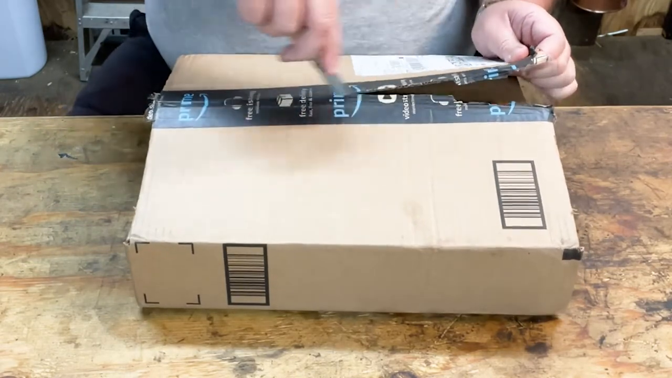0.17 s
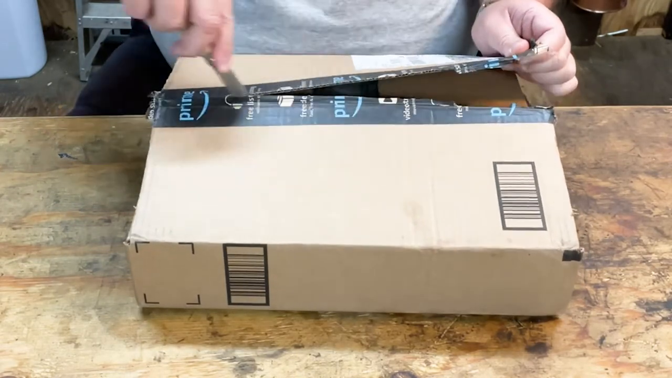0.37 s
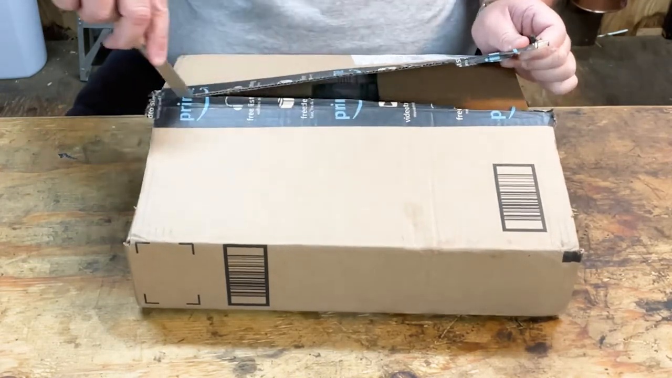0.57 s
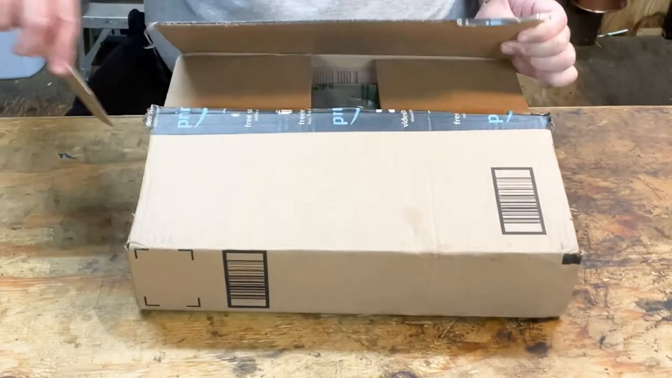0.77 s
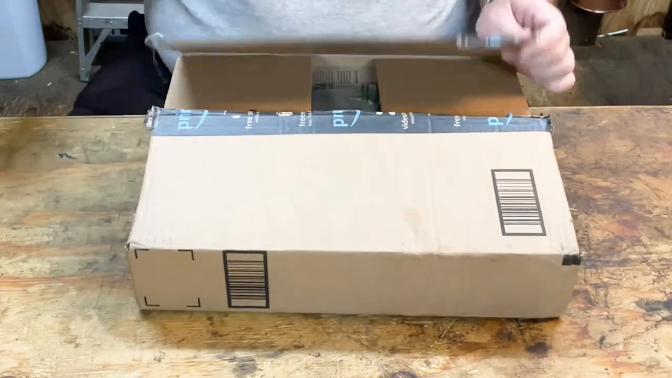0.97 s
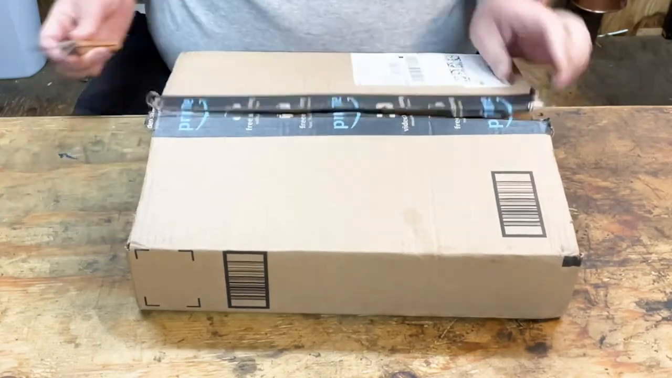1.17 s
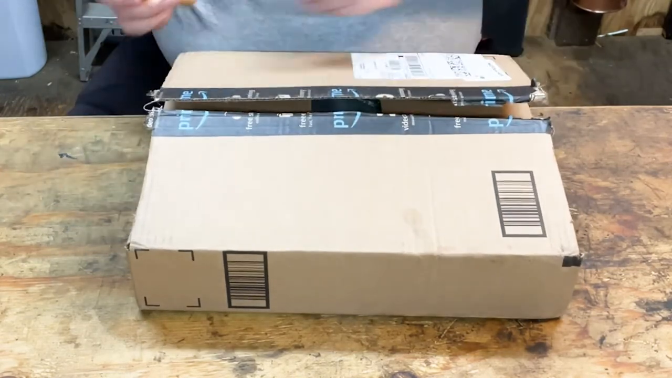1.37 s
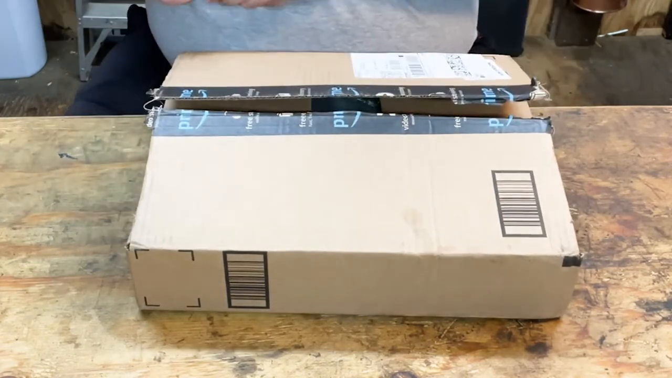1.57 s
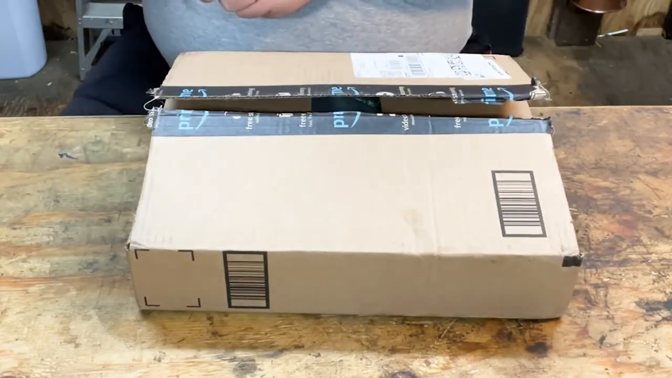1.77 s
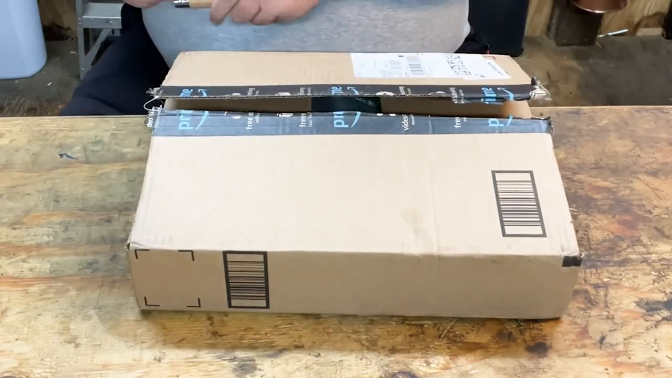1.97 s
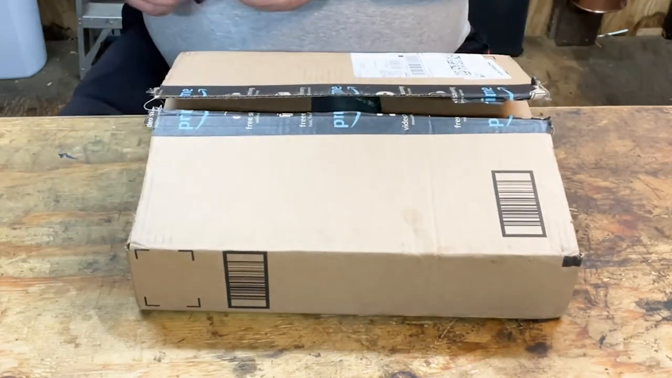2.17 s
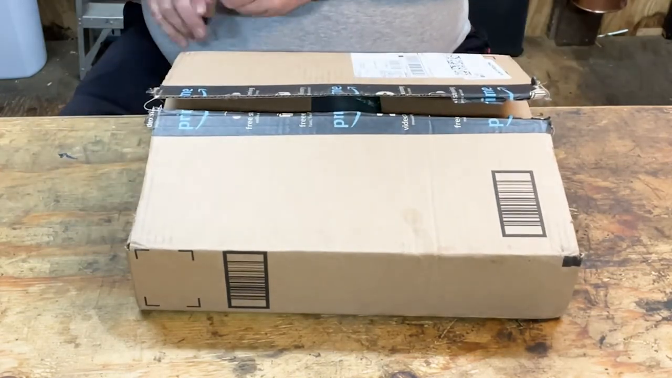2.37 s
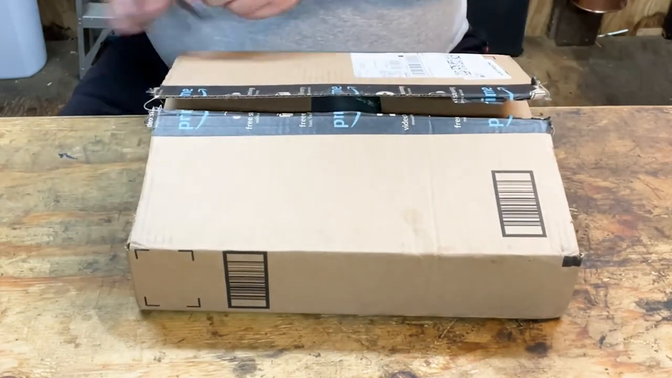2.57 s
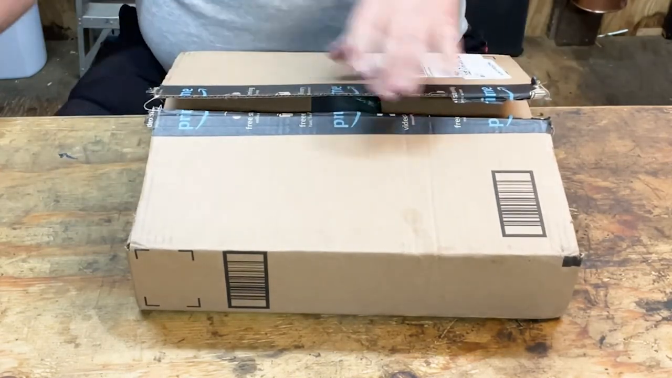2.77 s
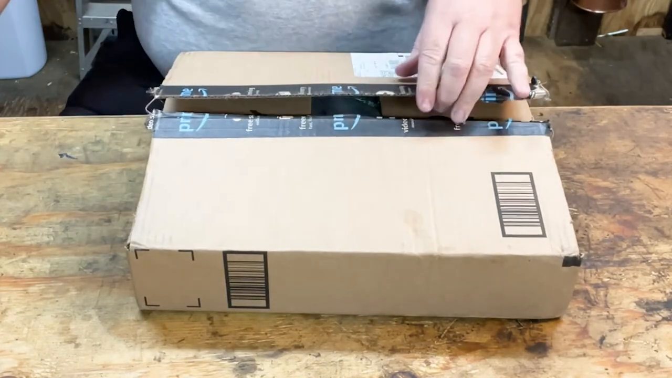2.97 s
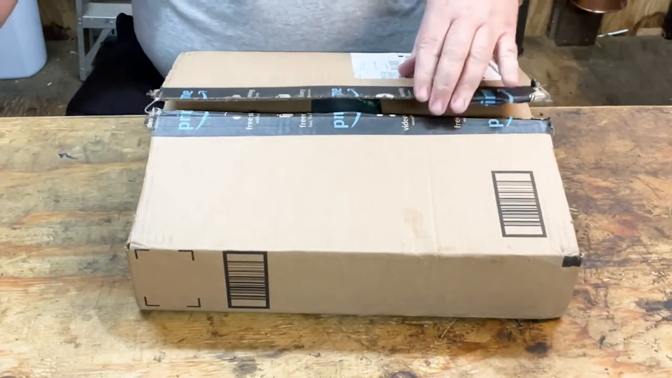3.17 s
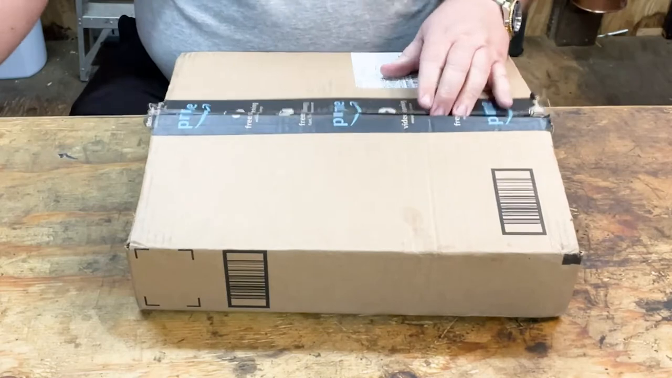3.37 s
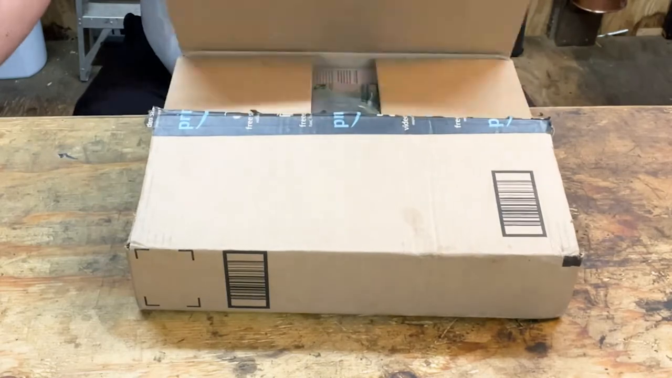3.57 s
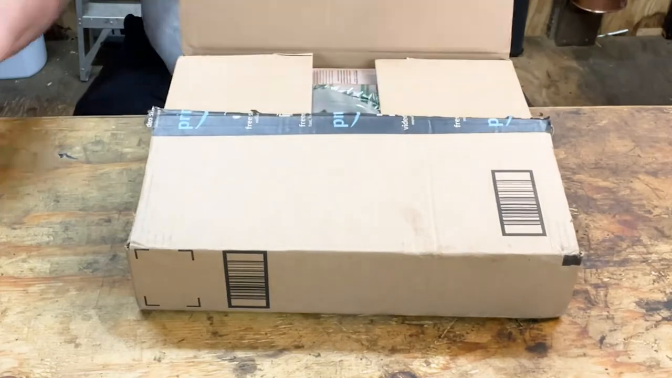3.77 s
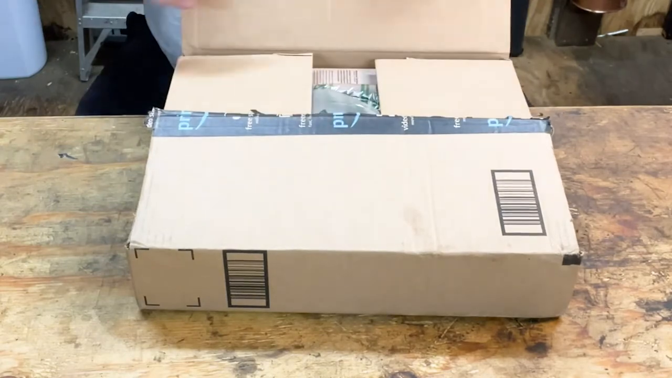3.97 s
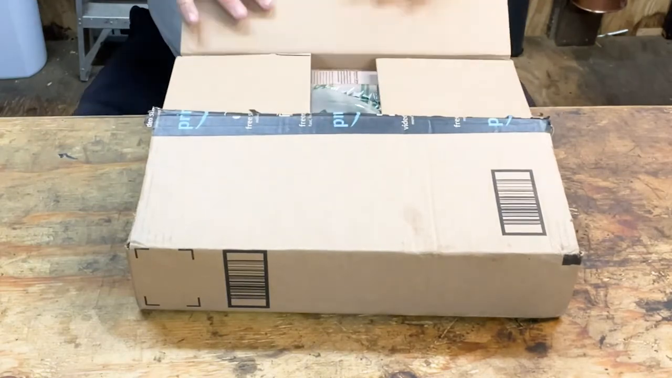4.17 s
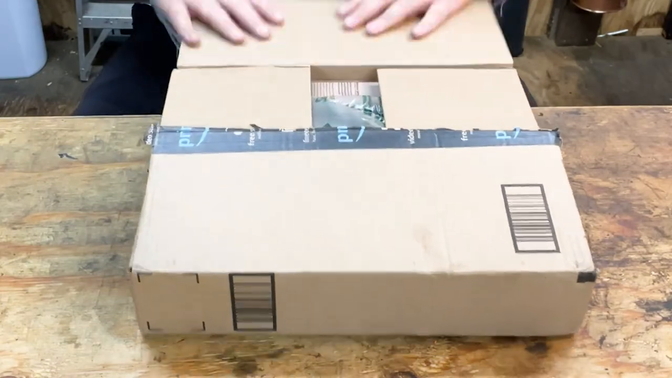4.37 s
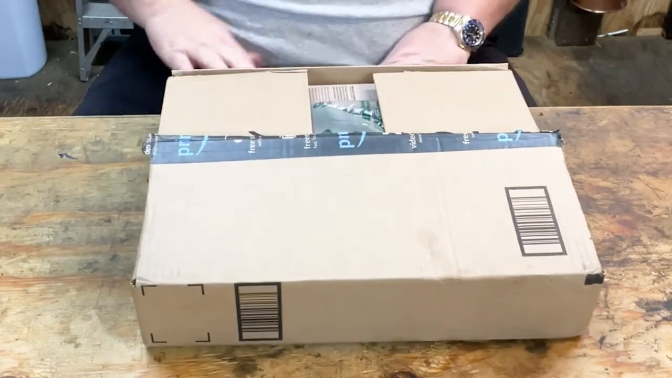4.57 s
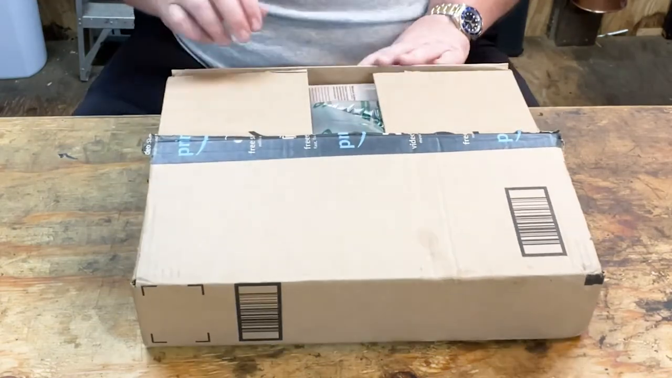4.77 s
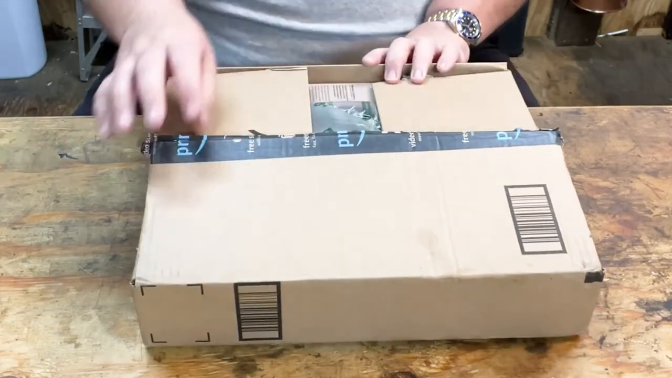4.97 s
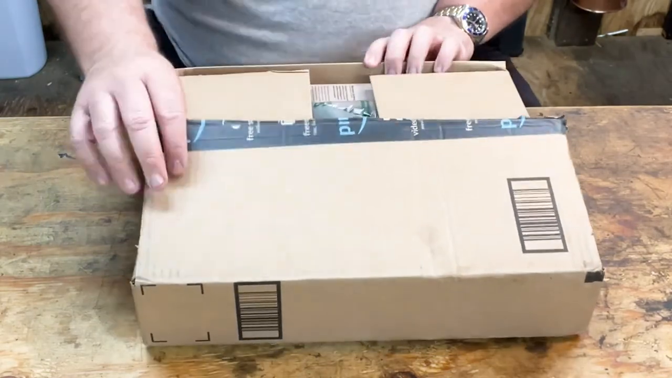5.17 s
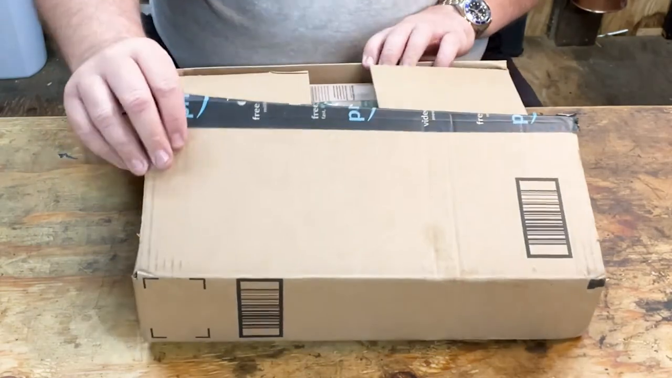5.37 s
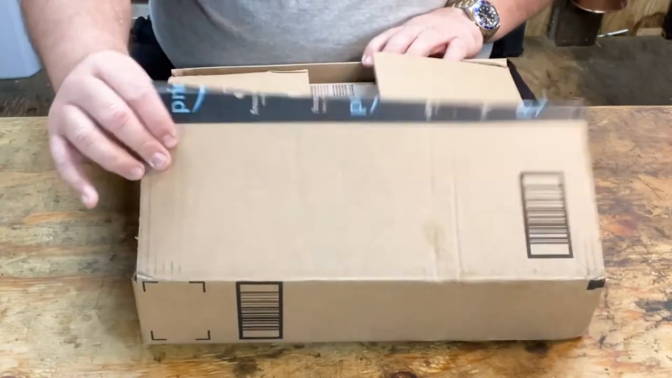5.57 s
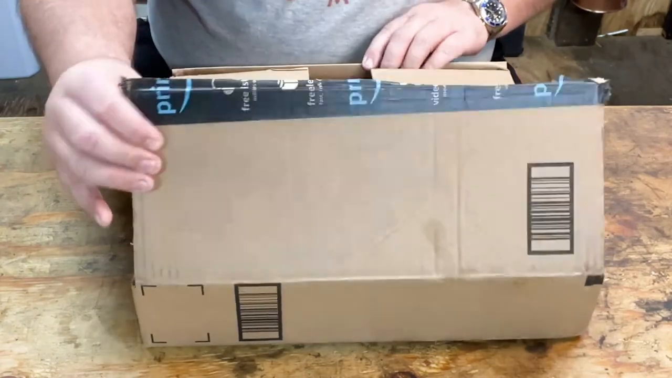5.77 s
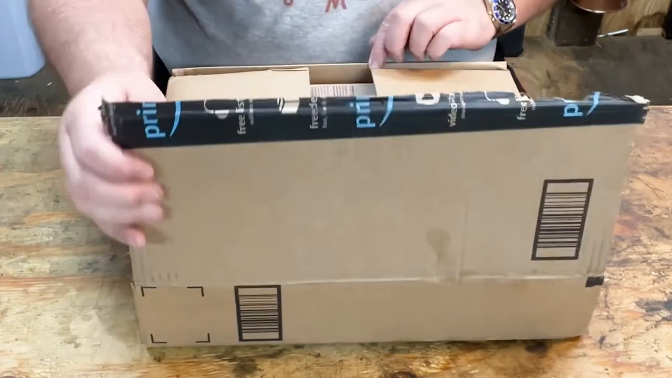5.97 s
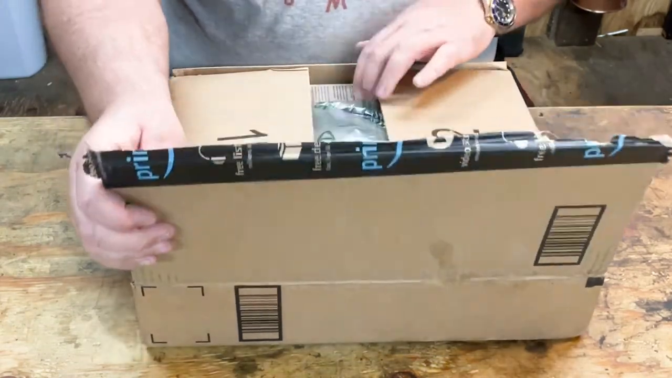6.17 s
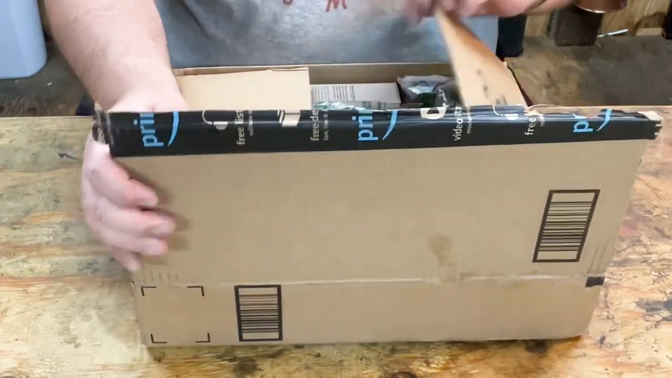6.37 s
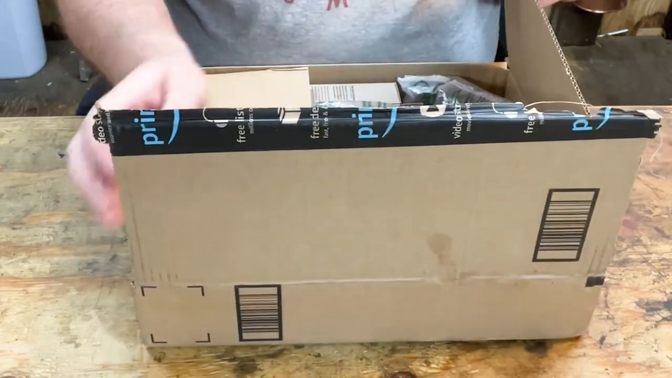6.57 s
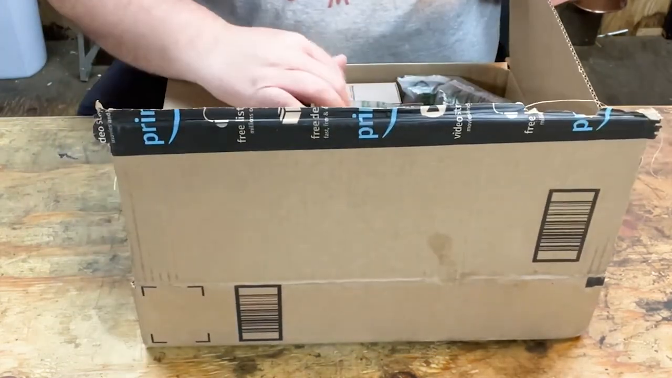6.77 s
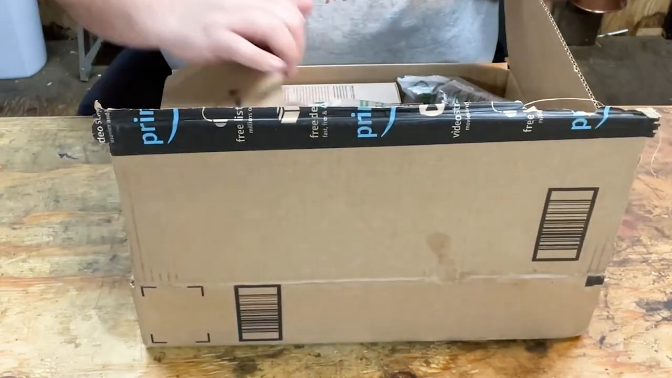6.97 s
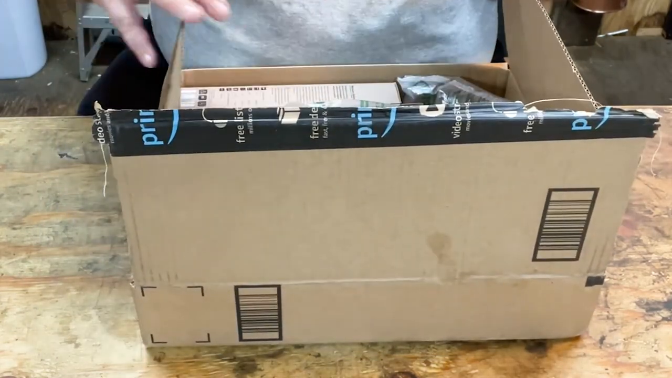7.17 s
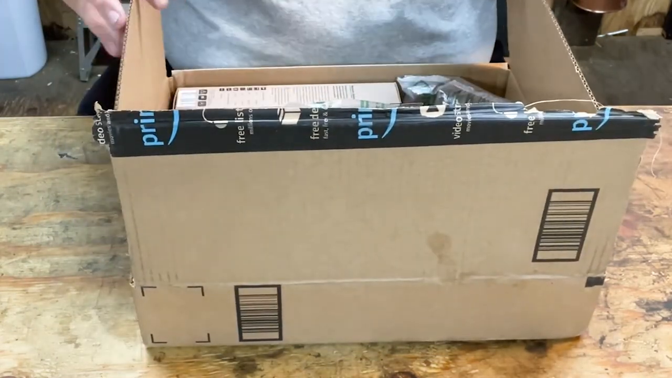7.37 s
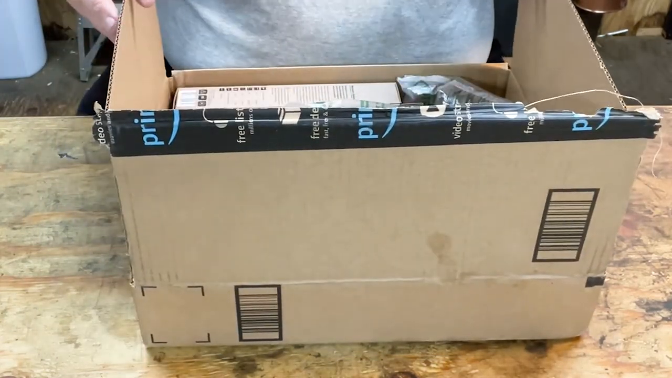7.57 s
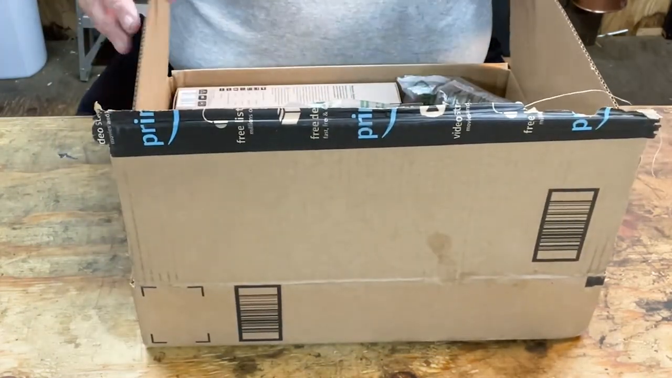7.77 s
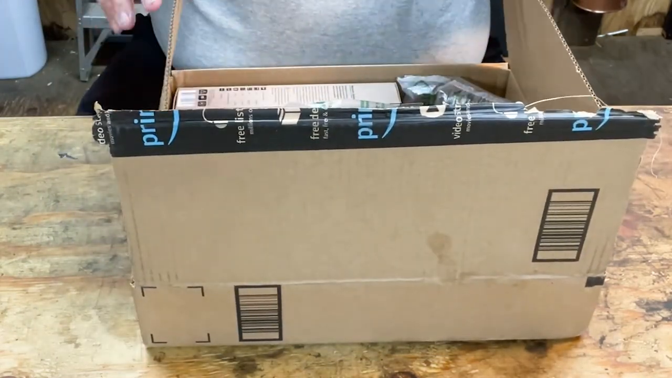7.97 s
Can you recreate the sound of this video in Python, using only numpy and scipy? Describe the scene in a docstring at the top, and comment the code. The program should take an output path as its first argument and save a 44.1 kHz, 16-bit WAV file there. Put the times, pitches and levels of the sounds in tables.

```python
"""A cardboard box on a wooden bench has its tape slit; the knife is folded and put down, then hands
pull the flaps open. Stick-slip rubbing and sudden cracks ring the hollow box, plastic wrap crinkles
inside, flaps puff air and lid panels spring free and sing. The steel blade rings as it snaps shut
and the bench thuds under the knife. A small workshop echoes the sudden sounds over a faint hum,
and the loudest crack clips."""
import sys
import numpy as np
from scipy import signal
from scipy.fft import rfft, irfft
from scipy.io import wavfile
from scipy.ndimage import uniform_filter1d, map_coordinates

SR = 44100
rng = np.random.default_rng(int(sys.argv[2]) if len(sys.argv) > 2 else 0)


def dump(signal):
    """Clip the signal to [-1, 1] and save it as 16-bit WAV at the path in sys.argv[1]."""
    limited = np.clip(np.atleast_2d(signal).T, -1, 1)
    pcm = np.round(limited * 32767).astype(np.int16)
    wavfile.write(sys.argv[1], SR, pcm)


N = 353946
LID_OPEN_S = 0.7  # the tape is slit through
ENVELOPE_STEP = 32  # samples between envelope points

# Modes of the hollow box, air cavity first. Each row: pitch in Hz, width in Hz, gain in dB.
BOX_MODES = [(210, 62, 12.5), (445, 54, -12), (738, 46, 9), (860, 28, -9), (1290, 30, -22.5),
             (1530, 1600, -14.5), (2240, 160, -1), (2230, 128, 1), (3080, 27, -23)]
# Broad treble resonances of scraped board. Each row: centre in Hz, width in Hz, gain in dB.
SCRAPE_MODES = [(2400, 8000, 36.5), (3600, 2900, 32), (5700, 7200, -3.5), (8070, 2150, 5.5),
                (10310, 1400, 5.5), (13800, 10000, 6)]


def undb(db):
    """Decibels to gain."""
    return 10 ** (np.asarray(db) / 20)


def rms(x, db):
    """Scale to an rms level."""
    return x * undb(db) / np.sqrt(np.mean(x ** 2))


def peak(x, db):
    """Scale to a peak level."""
    return x * undb(db) / np.abs(x).max()


def band(x, lo_hz, hi_hz):
    """Band-pass."""
    return signal.sosfilt(signal.butter(2, [lo_hz, hi_hz], "band", fs=SR, output="sos"), x)


def ring(x, modes):
    """Resonators summed in alternating polarity. Each mode: centre in Hz, width in Hz, gain in dB."""
    out = 0
    for k, (hz, width, db) in enumerate(modes):
        r = np.exp(-np.pi * width / SR)
        feedback = [1, -2 * r * np.cos(2 * np.pi * hz / SR), r * r]
        out = out + (-1) ** k * undb(db) * (1 - r) * signal.lfilter([1, 0, -1], feedback, x)
    return out


def walk(rate):
    """Smooth random drift, with `rate` new values a second."""
    k = int(SR / rate)
    steps = np.repeat(rng.standard_normal(N // k + 1), k)
    return uniform_filter1d(uniform_filter1d(steps, k), k)[:N]


def curve(points):
    """Join (seconds, value) points with straight lines."""
    return np.interp(np.arange(N) / SR, *np.transpose(points))


def add(out, s, x):
    """Mix x into out from time s."""
    i = int(s * SR)
    out[i:i + len(x)] += x[:N - i]


def contact(ms, rise_ms, blunt=1):
    """Contact envelope: swells quickly, dies away; a blunt one holds, then stops sooner."""
    t_ms = 1000 * np.arange(8192) / SR
    attack = (1 - np.exp(-t_ms / max(rise_ms, .05))) ** 2
    return attack * np.exp(-(t_ms / np.clip(ms, .3, 60)) ** blunt)


def burst(ms, rise_ms, blunt=1):
    """Contact force: a short rattle of noise."""
    envelope = contact(ms, rise_ms, blunt)
    return envelope * rng.standard_normal(len(envelope))


def swell(s, swell_ms, hold_ms, fade_ms):
    """Power envelope: rises to time s, holds, fades; swell and fade are the times for 20 dB."""
    ms = 1000 * (np.arange(0, N + ENVELOPE_STEP, ENVELOPE_STEP) / SR - s)
    return 100 ** (np.minimum(ms / swell_ms, 0) - np.maximum(ms - hold_ms, 0) / fade_ms)


def gain(power):
    """Envelope power to a gain at every sample."""
    return np.interp(np.arange(N), ENVELOPE_STEP * np.arange(len(power)), np.sqrt(power))


def grit(per_s, spread_db):
    """Fibres catching and letting go: sparse impulses of widely spread size."""
    when, polarity, strength = rng.random((3, N))
    size = np.minimum(-np.log(1 - strength), 4)
    return (when < per_s / SR) * np.sign(polarity - .5) * undb(spread_db * size)


def stroke_gains():
    """Strokes of blade and hands add up in power, giving gains for body, scratch, hiss and top."""
    # Each row: arrival at full strength in seconds, swell, hold and fade in ms, body level in dB,
    # scratch over body in dB, fineness (a treble lift) in dB.
    strokes = [(0.0, 10, 7.9, 56, -33, -11, -4), (0.073, 66, 290, 330, -36, -4, 0.5),
               (0.465, 54, 69, 25, -36, -7, 4.5), (0.583, 29, 9.3, 15, -37.5, -1, 3),
               (0.674, 140, 52, 30, -34, -8.5, 1.5), (0.76, 9, 5, 250, -45, -10, -25),
               (0.952, 32, 190, 67, -60, 0.5, 2.5), (1.14, 9.2, 4.3, 280, -65.5, -4, 8),
               (1.612, 410, 6.4, 310, -64, -5.5, 3), (1.912, 68, 5, 280, -56.5, -16, -4),
               (2.032, 74, 22, 340, -65, -2, 1), (2.898, 16, 5, 130, -45, -3.5, -9),
               (3.28, 59, 72, 410, -46, -5.5, -3.5), (3.72, 550, 7.5, 140, -55, 6, -5),
               (3.78, 18, 5, 480, -50.5, -9.5, 3), (4.094, 160, 4.4, 190, -52.5, -2.5, 8.5),
               (4.37, 300, 85, 200, -40, 0, -5), (4.57, 60, 9, 40, -49.5, -18, 0),
               (4.71, 89, 100, 190, -55.5, 4.5, -1.5), (4.958, 150, 4.4, 200, -41.5, -5, -8),
               (5.052, 14, 180, 140, -40, -5, -13), (5.329, 29, 123, 110, -46.5, -5.5, -1.5),
               (5.556, 150, 10, 60, -44, -8.5, -0.5), (5.8, 150, 51, 52, -30.5, -30, 13),
               (5.9, 69, 27, 250, -46.5, -6.5, 1), (6.0, 31, 50, 94, -49.5, 5, 5.5),
               (6.171, 14, 5.5, 770, -51.5, -1, -2), (6.42, 28, 79, 138, -30.5, -1.5, 6),
               (6.52, 80, 75, 170, -45, 4, -13), (6.708, 98, 6.6, 390, -40, -4.5, -2.5),
               (6.798, 23, 18, 140, -35.5, 2, -2.5), (6.889, 63, 16.4, 75, -42.5, 3, -4),
               (7.126, 16, 160, 400, -59.5, 9, 5), (7.289, 330, 55, 250, -58.5, 4, 6),
               (7.463, 63, 100, 132, -46, 1, 3.5), (7.771, 57, 5, 410, -39.5, -4, 4),
               (7.987, 15, 21, 75, -44, -8, 0)]
    power = 0
    for s, swell_ms, hold_ms, fade_ms, db, scratch_db, fine_db in strokes:
        over_db = np.array([0, scratch_db, scratch_db - 7.5 + .36 * fine_db, scratch_db - 9.5 + fine_db])
        power = power + undb(2 * (db + over_db))[:, None] * swell(s, swell_ms, hold_ms, fade_ms)
    return [gain(p) for p in power]


def rubbed_body(drag, t):
    """Drag rings the box, whose cavity booms less once slit; a free flap hums at its own pitch."""
    # Rubbed flaps. Each row: start and end in seconds, pitch in Hz, relative level in dB.
    flap_tones = [(0.059, 0.591, 530, -4), (0.066, 0.65, 378, -1), (5.79, 5.843, 750, -16),
                  (6.047, 6.092, 690, 2.5), (5.04, 5.1, 2400, -10.5), (4.56, 4.86, 1240, -7),
                  (7.146, 7.33, 700, 4), (7.14, 7.34, 4200, 0), (7.436, 7.6, 770, 0),
                  (7.861, 8.03, 332, -5.5)]
    grip = 2.5  # a rubbing hand or blade widens the modes by this factor
    cavity = ring(drag, BOX_MODES[:1]) * np.where(t < LID_OPEN_S, 1, undb(-12.5))
    walls = ring(drag, [(hz, grip * width, db) for hz, width, db in BOX_MODES[1:]])
    body = rms(cavity + walls + undb(3) * band(drag, 200, 1513), -3.5)
    for start, end, hz, db in flap_tones:
        flap = ring(drag * (t > start) * (t < end), [(hz, .18 * hz, 0)])
        duration_db = 10 * np.log10((end - start) * SR / N)
        body += rms(flap, db + duration_db)
    return body


def wander(x):
    """The contact wanders over the board: each narrow band swells and sinks a little on its own."""
    centres_hz = 900 * 2 ** (np.arange(12) / 3)
    return x + sum((undb(3 * walk(14)) - 1) * ring(x, [(hz, .2 * hz, 0)]) for hz in centres_hz)


def rubbing():
    """Stick-slip grit drives the box modes and the scratchy treble of the board."""
    # The blade edge rasping in the tape. Each row: centre in Hz, width in Hz, gain in dB.
    rasp_modes = [(5620, 310, 0), (7150, 920, -2), (8100, 140, -1)]
    throb_s, throb_hz, throb_db = 7.762, 35.5, 3  # the last flap drags over its ribs in even throbs
    t = np.arange(N) / SR
    throb = undb(throb_db * np.sin(2 * np.pi * throb_hz * (t - throb_s)) * (t > throb_s))
    grip_db = 1.4 * walk(70)  # the grip tightens and slackens for all bands at once
    snaps = grit(98, 2.6)  # now and then a whole fibre breaks
    body = rubbed_body(grit(5000, 2.5), t)
    fine = grit(13000, 2.8) + snaps
    coarse = grit(9000, 3.2) + snaps
    scratch = rms(wander(ring(band(coarse, 1000, 3700), SCRAPE_MODES[:2])), -4)
    hiss = rms(wander(ring(band(fine, 4300, 12000), SCRAPE_MODES[2:4])), -.6)
    top = rms(ring(band(grit(9000, 3.6) + snaps, 8000, 21000), SCRAPE_MODES[4:]), .6)
    rasp = rms(wander(ring(fine, rasp_modes)), -6) * (t < LID_OPEN_S)
    body_gain, scratch_gain, hiss_gain, top_gain = stroke_gains()
    treble = scratch_gain * scratch + hiss_gain * (hiss + rasp) + top_gain * top
    return throb * (undb(.5 * grip_db) * body_gain * body + undb(grip_db) * treble)


def lid_reflection(x):
    """Direct sound plus, during the cut, a bounce off the lid whose lag shifts as the blade moves."""
    # Delay of the bounce. Each row: time in seconds, lag in ms.
    lags = [(0, 1.6), (0.3, 1.47), (0.7, 1.48)]
    i = np.arange(N)
    bounce = map_coordinates(band(x, 186, 4840), [i - curve(lags) * SR / 1000], order=1)
    return x + undb(-7) * bounce * (i < LID_OPEN_S * SR)


def workshop():
    """Room tone: softly drifting air and a low, wavering hum."""
    # Colour of the air. Each row: frequency in Hz, relative level in dB.
    air_spectrum = [(53, -40), (90, -5), (222, -9.5), (276, -13.5), (335, -10), (538, -16), (983, -15.5),
                    (3010, -33.5), (5510, -31.5), (15500, -52)]
    # Wavering of the hum. Each row: time in seconds, level in dB.
    hum_levels = [(0, -50), (.8, -53.5), (1.9, -61.5), (2.2, -57), (3.2, -61), (4.7, -68), (5.3, -57),
                  (6.1, -68), (6.5, -62), (7.2, -69), (8.03, -51.5)]
    air_hz, air_db = np.transpose(air_spectrum)
    hz = np.maximum(np.fft.rfftfreq(N, 1 / SR), 1)
    colour = undb(np.interp(np.log(hz), np.log(air_hz), air_db))
    air = rms(irfft(rfft(rng.standard_normal(N)) * colour, N), -63.5) * undb(2 * walk(4))
    hum = rms(ring(rng.standard_normal(N), [(61, 13, 0)]), .38)
    return air + hum * undb(curve(hum_levels))


def board_cracks():
    """Each crack rings the box modes nearest its pitch; the treble is a shorter snap."""
    # Each row: start in seconds, body peak in dB, pitch in Hz, then bass, scratch and treble
    # in dB over the body, rattle length in ms.
    cracks = [(0.073, -37, 597, -12, -3, -14, 4), (0.189, -37, 650, -3, 10.5, -15, 7),
              (0.414, -28.5, 1330, 3.5, 12, 3, 1.9), (0.424, -33.5, 1208, -18, 11.5, 10, 3.3),
              (0.544, -22, 377, -10, -3, 1, 4.7), (0.594, -37, 620, 7.5, 5, 11, 5.1),
              (0.684, -17, 380, 1.5, 3.5, 0.5, 6.7), (0.692, -17, 360, -2, -31, -12, 7.1),
              (0.736, -32.5, 730, 6, -21, -3, 4.4), (1.1, -44, 740, 2, 0, 14.5, 7),
              (2.878, -33, 447, -3.5, -4, -6.5, 4.1), (3.236, -44.5, 890, 2.5, 2, -18, 2.4),
              (3.284, -47, 700, -11, 10, 6, 14), (3.779, -34, 640, 5, -38, -5.5, 22),
              (4.222, -28.5, 340, -4.5, -25, -26, 13), (4.508, -37, 332, -3, -15, -20, 4.6),
              (4.951, -33, 1220, -21, -16, 1.5, 3.1), (4.967, -33.5, 965, -3.5, -21, -11, 9.1),
              (5.135, -28.5, 447, -11.5, -4, -13, 6.9), (5.1635, -13, 890, -36, 4.5, 4, 2.1),
              (5.171, -14.5, 663, -6.5, 5, 1.5, 5.4), (5.286, -21.5, 670, -9, -19, -9, 7.3),
              (5.302, -19.5, 590, -4.5, -2.5, -8.5, 5.5), (5.606, -2.5, 666, -23, 4, -3, 8.8),
              (5.614, -7.5, 880, -21, -7, 10, 6.3), (5.626, -13.5, 327, -15.5, 0, -6.5, 21),
              (5.771, -10.5, 950, -16, -3, -22, 6.2), (5.985, -38.5, 534, -21, -3, 2, 10.7),
              (6.173, -44.5, 700, -6, 5, -6, 8.9), (6.271, -43, 817, -12, 3, -9, 5),
              (6.385, -15, 880, -5.5, -6.5, -13, 3.5), (6.393, -18.5, 630, -14, -31, -3, 4.9),
              (6.405, -26, 544, -7, -22, 2, 4.3), (6.414, -22, 580, -33, -23, -3, 3),
              (6.794, -45, 1237, -28, 17.5, -4, 4.7), (6.815, -30.5, 820, -3, -7, 2.5, 8.8),
              (7.552, -35.5, 800, -14, -12, -15, 3.9), (7.707, -46.5, 670, -11, 5, 3, 4.7),
              (7.736, -27.5, 772, -16, 6, 1.5, 5.9), (7.855, -33, 850, -9, -0.5, 0, 11),
              (7.985, -34.5, 549, -21, 1, -0.5, 4.1)]
    damping, db_per_octave = 1.6, 53  # hands on the board widen the modes; those off pitch fall away
    out = np.zeros(N)
    for s, db, hz, bass_db, scratch_db, treble_db, ms in cracks:
        rise_ms = .13 * ms
        force = burst(ms, rise_ms, blunt=1.4)
        snap = burst(.5 * ms, rise_ms, blunt=.82)
        near = [(f, damping * width, mode_db - db_per_octave * abs(np.log2(f / hz)))
                for f, width, mode_db in BOX_MODES[1:]]
        body = peak(ring(band(force, 250, 1700), near + [(hz, .5 * hz, -3)]), db)
        bass = peak(ring(band(force, 190, 490), BOX_MODES[:1]), db + bass_db)
        scratch = peak(band(band(snap, 910, 3500), 910, 3500), db + scratch_db)
        treble = peak(ring(snap, SCRAPE_MODES[1:]), db + treble_db)
        add(out, s, body + bass + scratch + treble)
    return out


def room_echo(x):
    """Diffuse echo of the small workshop; the treble dies sooner."""
    low_t60_s, high_t60_s = .32, .27
    t = np.arange(int(.8 * SR)) / SR
    low = band(rng.standard_normal(len(t)), 80, 2500) * undb(-60 * t / low_t60_s)
    high = band(rng.standard_normal(len(t)), 2100, 15000) * undb(-1.5 - 60 * t / high_t60_s)
    onset = np.clip((t - .003) / .00062, 0, 1)
    level = undb(-6) / np.sqrt(np.sum(low ** 2) * SR / 5000)
    return signal.fftconvolve(x, (low + high) * onset * level)[:N]


def flap_rumble():
    """Swinging flaps stir the air into a deep rumble above a faint floor."""
    # Each row: crest in seconds, level in dB, time to fade by 20 dB in ms.
    swings = [(.76, -44.5, 700), (3.8, -39.5, 354.5), (4.74, -54, 400), (5.74, -35.5, 295.5),
              (5.9, -43, 393.5), (6.4, -44.5, 402), (7.8, -56.5, 900)]
    floor_db, swell_ms = -70, 350
    stirred = sum(undb(2 * db) * swell(s, swell_ms, 0, fade_ms) for s, db, fade_ms in swings)
    return rms(band(rng.standard_normal(N), 15, 31), .94) * gain(undb(2 * floor_db) + stirred)


def flap_puffs():
    """A flap swings: a pull of air flips into a stronger push that settles."""
    # Each row: moment of the flip in seconds, peak in dB, width in ms.
    puffs = [(0.686, -21, 1.7), (0.724, -26, 2.5), (2.887, -30.5, 1.05), (3.778, -18, 1.7),
             (4.222, -25.5, 0.56), (5.623, -22, 2.1), (5.876, -34, 4.7), (6.391, -32, 2.1),
             (7.746, -45, 4.1)]
    lead = 2048  # samples before the flip
    out, t_ms = np.zeros(N), 1000 * np.arange(-lead, 2 * lead) / SR
    for s, db, ms in puffs:
        pressure = t_ms * np.exp(-np.abs(t_ms) / ms) * np.where(t_ms < 0, .6, 1)
        add(out, s - lead / SR, peak(pressure, db))
    return out


def film_crinkles():
    """Tape and plastic wrap buckle in short bright bursts."""
    # Each row: start in seconds, film peak in dB, pitch in Hz, lower crackle over it in dB, length in ms.
    crinkles = [(0.7931, -45, 8100, -12, 4.4), (0.84, -51.5, 8010, -32.5, 3.3), (3.36, -55, 8100, 18, 5.1),
                (3.725, -58, 7540, -2, 2), (4.5173, -34, 7400, -28, 2.9), (4.911, -52, 7500, 11, 1.7),
                (5.568, -54, 7500, -5, 1.8), (5.618, -14.5, 13000, -10, 2.5), (5.7616, -31, 12900, 6, 2.6),
                (5.945, -51, 7740, 15, 3), (6.092, -47, 7540, -14, 1.4), (6.107, -36, 7300, -9.5, 1.7),
                (6.142, -44, 7500, -3, 1.2), (6.299, -36.5, 7530, -25, 1.5), (6.4441, -9, 8270, -5.5, 5.2),
                (6.459, -12, 8450, -15, 3.5), (6.4726, -16, 8500, -7, 4), (6.486, -12.5, 8540, -7, 3.4),
                (6.4976, -17, 8450, -17, 4.4), (6.51, -23, 9000, -6, 4.7), (6.543, -13.5, 8000, -2.5, 6.5),
                (6.5779, -28, 8300, 2.5, 5.8), (6.698, -24.5, 7400, -29, 4.3),
                (7.452, -26.5, 8150, -6, 7.1), (7.511, -28, 7800, -15, 10), (7.553, -31, 7000, -4, 4.7)]
    out = np.zeros(N)
    for s, db, hz, lower_db, ms in crinkles:
        force = burst(ms, .35 * ms, blunt=1.5)
        mode = [(hz, 2200, 0)]
        film = peak(ring(ring(force, mode), mode), 0) + peak(band(force, 10900, 14300), -3.3)
        crackle = band(force, 1000, 9100) + ring(force, [(4350, 1000, 3.5)])
        add(out, s, peak(film, db) + peak(crackle, db + lower_db))
    return out


def knife_ticks():
    """Small parts touch lightly as the knife is turned in the hands."""
    # Each row: start in seconds, peak in dB, pitch in Hz.
    ticks = [(1.232, -49, 2470), (1.453, -52, 2200), (1.61, -55.5, 6000), (1.814, -48.5, 1490),
             (1.934, -52, 3500), (2.46, -58, 3600), (2.51, -56, 4000)]
    out = np.zeros(N)
    for s, db, hz in ticks:
        add(out, s, peak(band(burst(ms=3.8, rise_ms=.5), .39 * hz, 1.06 * hz), db))
    return out


def blade_clink():
    """The blade snaps shut with a clatter and rings on in the hand."""
    # Each row: start in seconds, level in dB, rise in ms, clatter length in ms.
    clinks = [(2.202, -37, 2.3, 48)]
    # Modes of the blade. Each row: pitch in Hz, gain in dB, time to fade by 60 dB in seconds.
    steel_modes = [(953, -5, 0.2), (3488, -15, 0.42), (3677, -6, 0.24), (3881, -3, 0.17), (5190, 2, 0.26),
                   (7036, -10, 0.25), (7386, -3, 0.34), (7903, -10, 0.25), (9329, -16, 0.28),
                   (13500, -13, 0.22)]
    flicker_db = 2  # fingers touch the ringing blade unevenly
    out, t = np.zeros(N), np.arange(16384) / SR
    for s, db, rise_ms, ms in clinks:
        steel = 0
        for hz, mode_db, t60 in steel_modes:
            level_db = mode_db - 60 * t / t60 + flicker_db * walk(90)[:len(t)]
            steel = steel + undb(level_db) * np.sin(2 * np.pi * hz * t)
        attack = 1 - np.exp(-1000 * t / rise_ms)
        add(out, s, peak(steel * attack, db - 5.5))
        clatter = ring(burst(ms, rise_ms), [(1440, 1000, -6), (3730, 700, -6.5), (7900, 2700, -9)])
        add(out, s, peak(clatter, db - 4))
    return out


def knife_on_bench():
    """The folded knife lands and bounces: the wood thuds, the handle rattles, a loose part chatters."""
    # Each row: start in seconds, wood peak in dB, then bass, scratch and handle in dB over the wood,
    # rattle length in ms.
    landings = [(2.9817, -16.5, 0, 0, -4.5, 15.2), (2.9968, -21, -11, -0.5, -37, 41),
                (3.538, -30, -4.5, -3, -27.5, 8.4), (3.5587, -20.5, 0, -11.5, -22, 39),
                (3.613, -23.5, 0, 2.5, -6, 7.9), (3.625, -26, -5.5, -1.5, -17, 38)]
    # Chatter of the loose part. Each row: start in seconds, peak in dB, rise in ms, length in ms.
    chatters = [(3.562, -25, 4.3, 10), (3.616, -24.5, 4.4, 13)]
    # Modes of the bench and of the handle it damps. Each row: pitch in Hz, width in Hz, gain in dB.
    bench_modes = [(410, 160, 5), (804, 135, 9.5), (1036, 88, 13), (1335, 230, 8), (2600, 17, 2)]
    handle_modes = [(2940, 120, 9.5), (3580, 77, 3), (4690, 260, 11.5), (5600, 170, 9), (7460, 540, 7)]
    chatter_hz = 370
    out = np.zeros(N)
    for s, db, bass_db, scratch_db, handle_db, ms in landings:
        force = burst(ms, rise_ms=.083)
        first_touch = peak(band(signal.unit_impulse(len(force)), 280, 1300), db + 4)
        thud = peak(ring(force, bench_modes), db) + peak(band(force, 197, 480), db + bass_db)
        scratch = peak(band(force, 1260, 2390), db + scratch_db)
        rattle = peak(ring(force, handle_modes), -.75) + peak(band(force, 3100, 14000), -33.5)
        add(out, s, first_touch + thud + scratch + rattle * undb(db + handle_db))
    for s, db, rise_ms, ms in chatters:
        envelope = contact(ms, rise_ms)
        tap_count = np.floor(np.arange(len(envelope)) / SR * chatter_hz)
        taps = envelope * np.diff(tap_count, prepend=0)
        buzz = peak(ring(taps, handle_modes), 0) + peak(band(taps, 1800, 9200), 3.5)
        add(out, s, peak(buzz, db))
    return out


def lid_panels():
    """Panels of the lid spring free and sing: fluttering tones that glide as the board relaxes."""
    # Each row: start in seconds, peak in dB, first and last pitch in Hz, rise and length in ms,
    # octave over the fundamental in dB.
    panels = [(5.606, 7, 699.3, 701, 1.8, 14, -16), (5.613, 0, 489, 470, 3, 8, -17.5),
              (5.619, -11, 225, 196, 6.2, 32, -10.5), (5.646, -16.5, 445, 446.4, 8, 45, -12.5),
              (5.7684, -8.5, 715, 1257, 5.6, 9, -28), (5.771, -16, 2760, 2270, 3.8, 6.5, -24)]
    pitch_wobble, level_flutter = .045, .45
    out = np.zeros(N)
    for s, db, start_hz, end_hz, rise_ms, ms, octave_db in panels:
        envelope = contact(ms, rise_ms, blunt=1.7)
        n = len(envelope)
        hz = np.interp(1000 * np.arange(n) / SR, [0, 1.5 * ms], [start_hz, end_hz])
        hz *= 1 + pitch_wobble * walk(start_hz / 2)[:n]
        phase = 2 * np.pi * np.cumsum(hz) / SR
        tone = np.sin(phase) + undb(octave_db) * np.sin(2 * phase)
        flutter = 1 + level_flutter * walk(start_hz / 2)[:n]
        add(out, s, peak(envelope * flutter * tone, db))
    return out


def scene():
    """Mono mix, with the room behind the sudden sounds; the panel tones get less echo and sound drier."""
    hits = board_cracks() + blade_clink() + knife_on_bench() + film_crinkles() + knife_ticks()
    tones = lid_panels()
    echo = room_echo(hits + undb(-9) * tones)
    friction = lid_reflection(rubbing())
    air = flap_puffs() + workshop() + flap_rumble()
    return (hits + tones + echo + friction + air)[None]


def record(dry):
    """The converter clips at full scale; a steep low-pass cuts the top."""
    top_hz = 15700
    low_pass = signal.ellip(8, .2, 70, top_hz, fs=SR, output="sos")
    return np.clip(signal.sosfilt(low_pass, np.clip(dry, -1, 1)), -1, 1)


dry = scene()
out = record(dry)
dump(out)
```